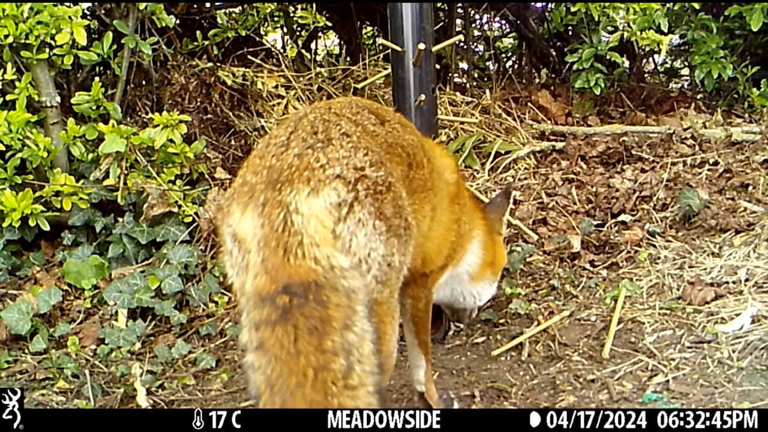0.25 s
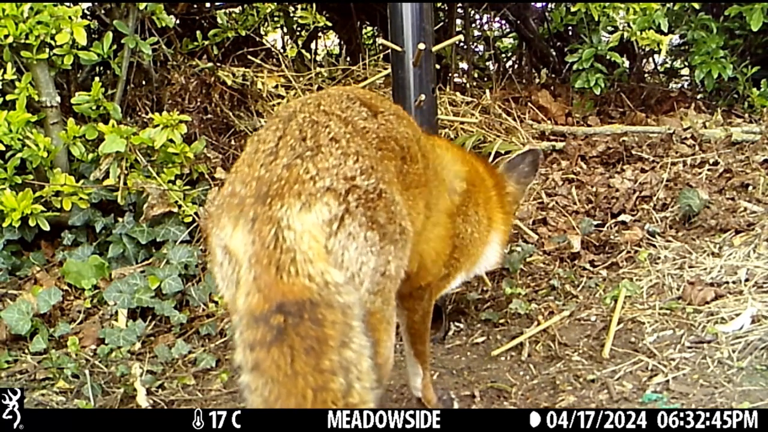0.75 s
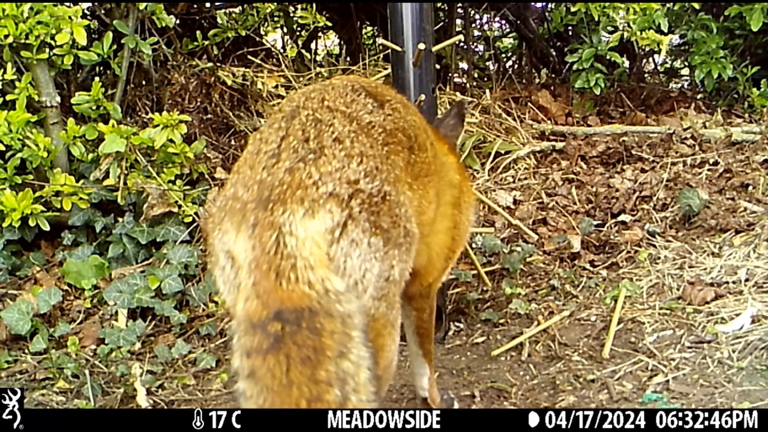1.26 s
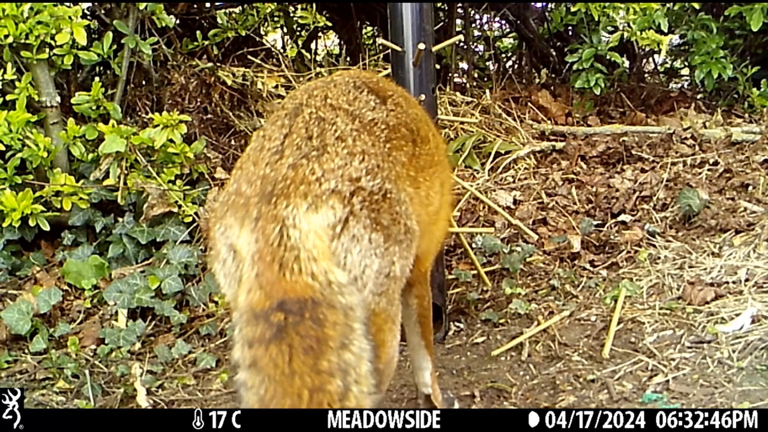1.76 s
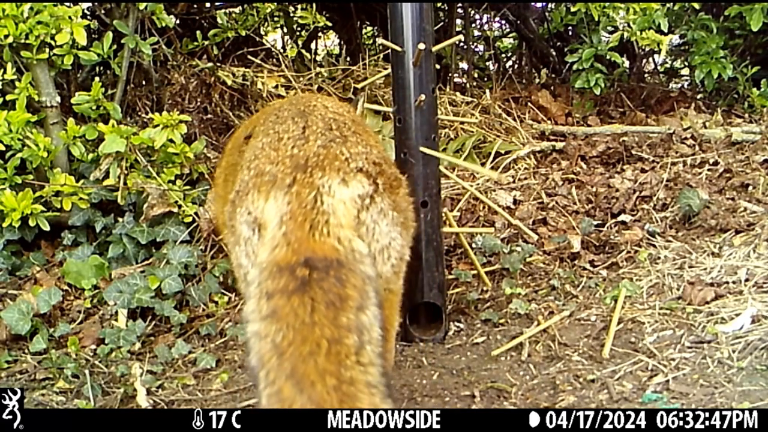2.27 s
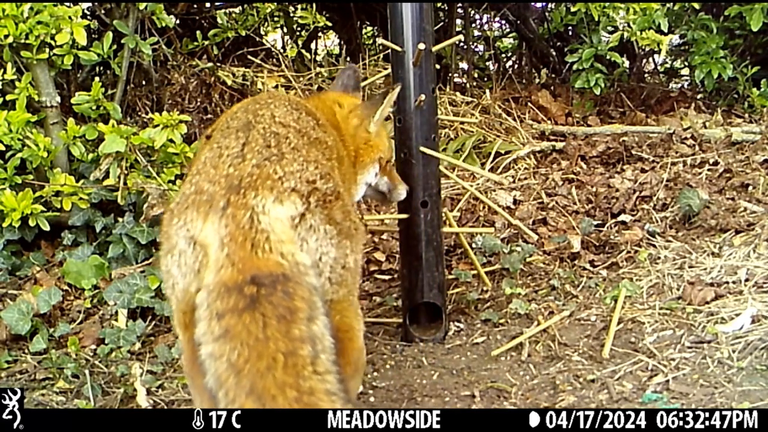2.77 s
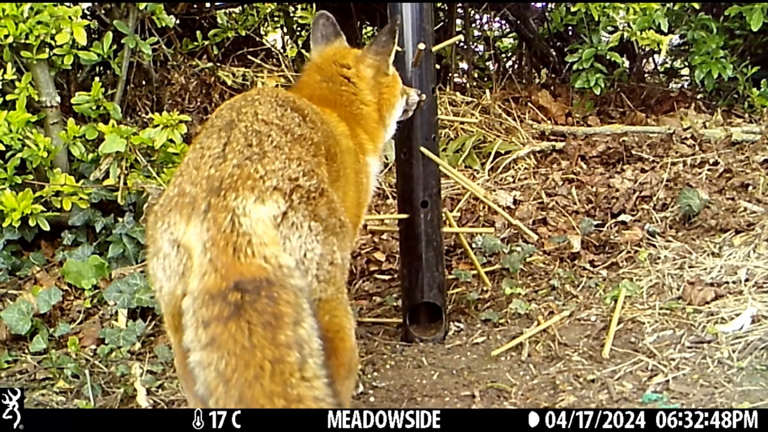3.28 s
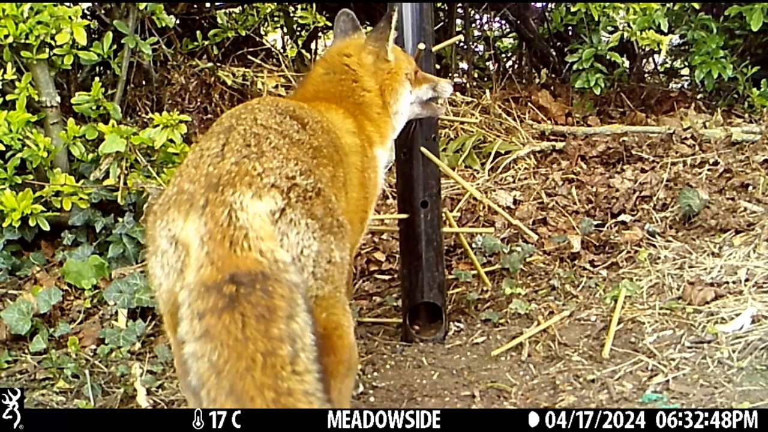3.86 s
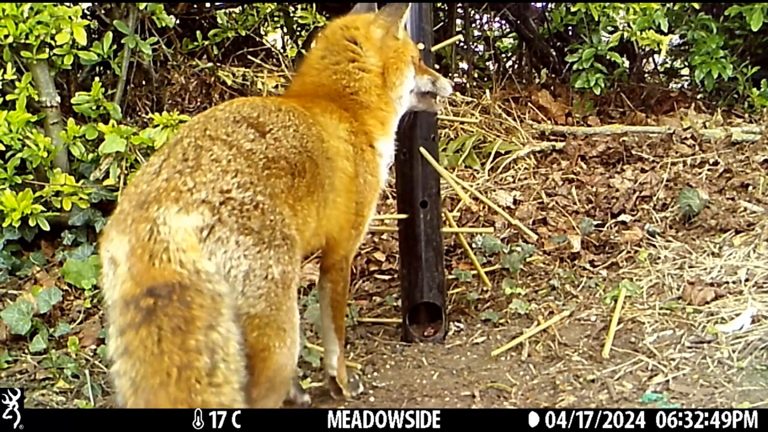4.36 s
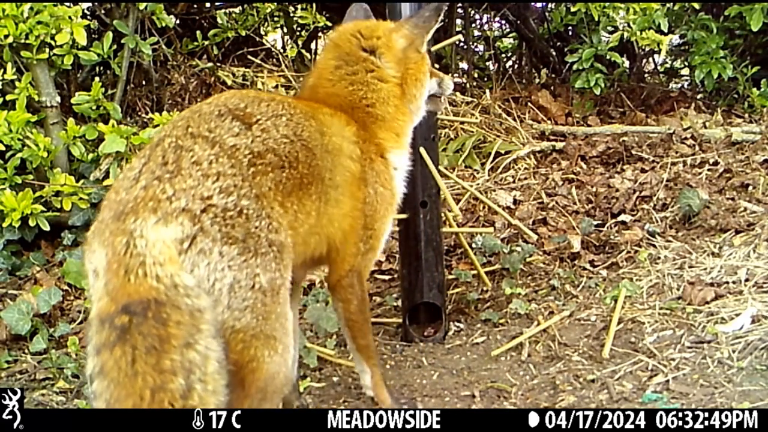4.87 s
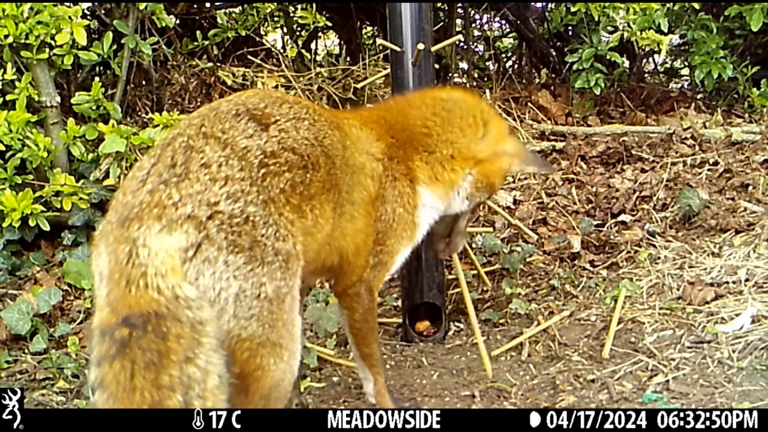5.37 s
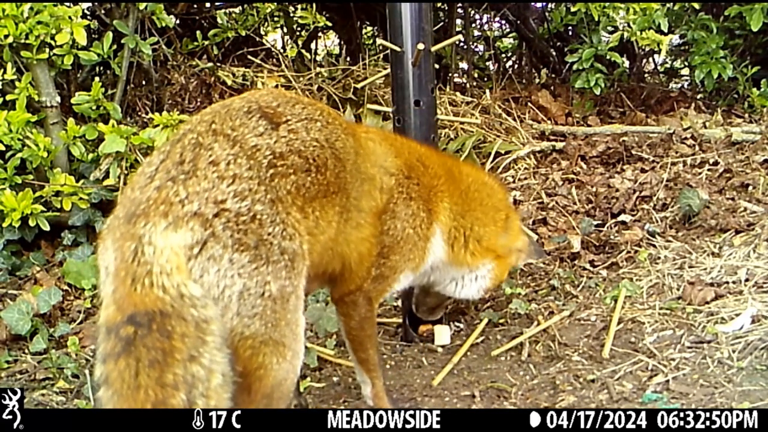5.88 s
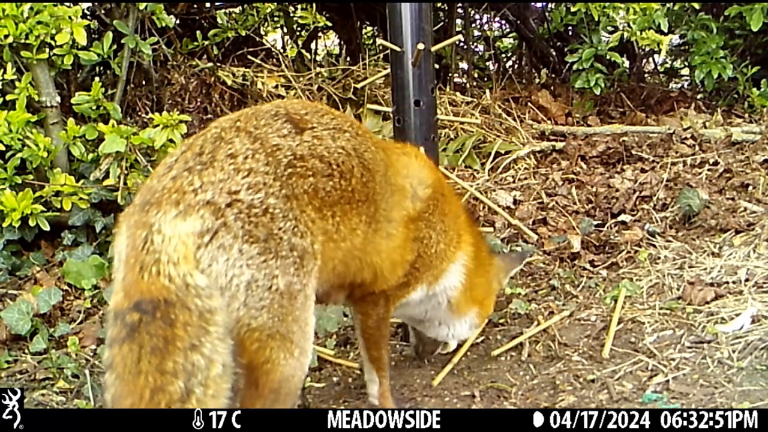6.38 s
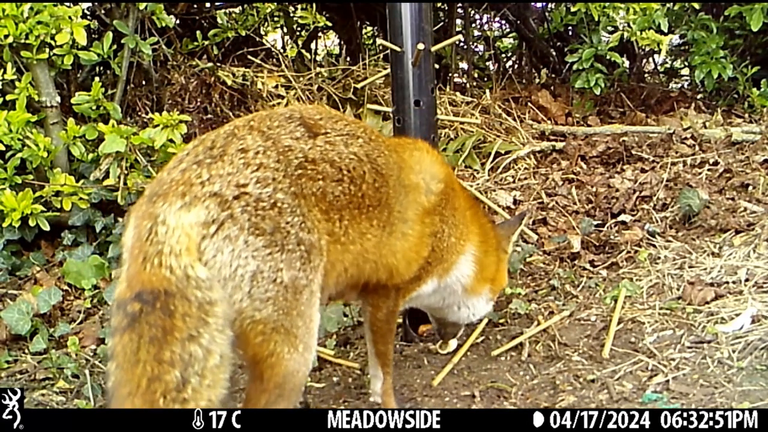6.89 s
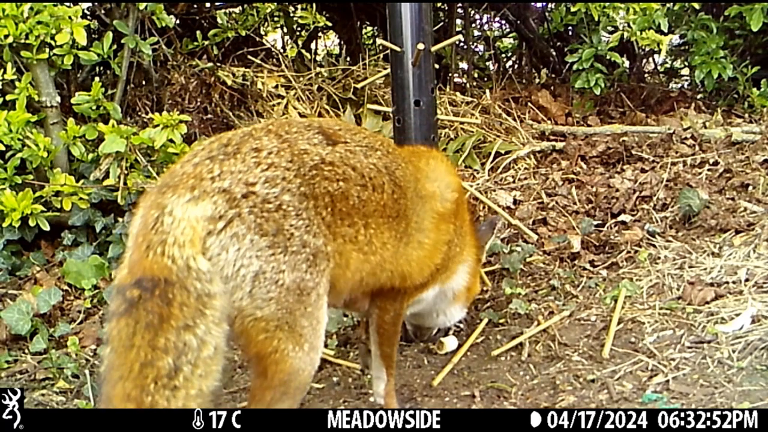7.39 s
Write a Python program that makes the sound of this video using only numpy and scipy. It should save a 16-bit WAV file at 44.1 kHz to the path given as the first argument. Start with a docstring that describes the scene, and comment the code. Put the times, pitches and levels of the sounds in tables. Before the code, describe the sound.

A fox works at a garden pipe feeder: sparse clicks, a bright clink, then a dense clattering burst, over faint bird chirps and soft air.

```python
"""Fox at the pipe feeder

A fox pulls a stick out of an upright plastic pipe feeder, close to a small outdoor camera's microphone.
Sticks and hard treats knock, clink, tick and rattle: noise cracks through resonances, plus decaying modes.
Sticks slide as random slips. Further back, sparrows chirp as gliding tones with noise-tail echoes from
the hedge, over filtered-noise air and the drone of one far engine.
"""
import sys
import numpy as np
from scipy import signal
from scipy.fft import rfft, irfft, next_fast_len
from scipy.io import wavfile
from scipy.ndimage import map_coordinates

SR = 44100
rng = np.random.default_rng(int(sys.argv[2]) if len(sys.argv) > 2 else 0)


def wav_record(signal):
    """Record a signal, one row per channel, as 16-bit PCM in the file named by sys.argv[1]."""
    frames = np.transpose(np.atleast_2d(signal))
    bounded = np.clip(frames, -1, 1)
    # unit amplitude maps onto the largest positive 16-bit level
    quanta = np.round(bounded * 32767).astype(np.int16)
    wavfile.write(sys.argv[1], SR, quanta)


N = 336654

# Spectrum of distant traffic and garden air: (frequency [Hz], relative level [dB])
AIR = [(15, -29.5), (25, -4.5), (49, -4.5), (96, -5.5), (142, -8), (259, -9), (420, -12), (497, -9.5),
       (633, -9), (1130, -3.5), (1270, -5.5), (2890, -10), (3860, -14), (7060, -20), (7960, -23),
       (10300, -59.5), (17500, -120)]
AIR_DB = -59.5  # average level of the air
# Colour the camera housing adds to the air: (centre [Hz], width [Hz], level [dB])
HOUSING = [(54, 18, -8), (880, 240, -9.5), (1070, 500, -19.5), (1830, 420, -14.5)]
# Far engine: nearest moment, time from there to fall 3 dB, level when nearest
ENGINE_AT_S, ENGINE_SWELL_S, ENGINE_DB = .75, 0.27, -72

# Sparrow syllables, each a few slurs:
# (time from syllable start [s], length [s], first pitch [Hz], last pitch [Hz], relative level [dB])
CHIRRUP = [(.004, 0.027, 4400, 3470, -6.5), (.025, 0.0442, 3600, 3150, -11.5),
           (0.061, 0.0204, 3350, 3980, 1.5), (.098, .048, 3850, 3060, -11)]
CHEEP = [(.01, .07, 3950, 4020, -6), (.068, 0.023, 4150, 4520, -4.5), (.094, .034, 4215, 2950, 3.5)]
CHIP = [(.002, .022, 3565, 3970, -1.5), (.048, .032, 3400, 3050, -6.5)]
TWEET = [(0, .035, 3900, 4360, -7.5), (.025, .05, 4200, 3450, -4)]
WHISTLE = [(0, .09, 3230, 2960, -1.5)]
# Sparrow calls in the hedge: (time [s], relative level [dB], syllable)
CHIRPS = [(.158, -47.5, CHIRRUP), (0.699, -50.5, CHEEP), (1.35, -47.5, CHIRRUP), (1.722, -52.5, CHIP),
          (1.915, -52.5, TWEET), (2.41, -49, CHIRRUP), (2.67, -50.5, CHIP), (2.9, -55.5, TWEET),
          (4.84, -54.5, WHISTLE), (6.489, -60, TWEET), (6.79, -52, CHIRRUP), (7.215, -53.5, CHIP),
          (7.471, -58, TWEET)]

# Resonances of a contact, low to high: (centre [Hz], width [Hz], relative level [dB])
KNOCK_BODY = [(445, 55, -9.5), (803, 140, -7.5), (1463, 210, -2.5), (1910, 150, -1), (2390, 390, -4.5)]
CLICK_BODY = [(2760, 280, -9), (3170, 180, -2.5), (3600, 240, 0.5), (4200, 430, -6.5)]
SNAP_BODY = [(5070, 440, 4.5), (5690, 400, 5.5), (6490, 460, 0.5), (7300, 400, -18.5)]
# Bending modes of a stick: (multiple of its pitch, relative level [dB], share of its t60)
STICK_MODES = [(.405, -28, .6), (.537, -20.5, 1.2), (.755, -15.5, 0.34), (.872, -4, 0.39),
               (.988, -6.5, 0.29), (1, 0.5, 1), (1.16, -24, 0.49), (1.58, -31.5, .5)]
STICK_RING_DB = -5.5  # the ring against the crack of the blow
# Modes of the pipe wall: (frequency [Hz], relative level [dB], t60 [s])
PIPE_MODES = [(448, -27, 0.11), (1436, -0.5, 0.1), (1469, -1, 0.15), (2220, -7.5, 0.043),
              (2830, -10, 0.054), (3205, -3, 0.089), (3760, -4, 0.18), (6400, -20, 0.088)]

# Loose pieces rattling on after a disturbance: (start [s], length [s], relative level [dB])
RATTLES = [(3.589, .08, -44), (3.86, .05, -45), (5.0, .25, -41), (5.405, 0.12, -34.5)]
RATTLE_PER_S, RATTLE_SCATTER_DB = 38, 2  # contacts a second, spread of their strength
RATTLE_HZ, RATTLE_SPREAD = 3550, .08  # pitch of the pieces, its relative spread
# Strokes of sticks and treats sliding on the pipe: (start [s], length [s], relative level [dB])
SLIDES = [(4.18, .25, -62), (4.469, 0.039, -55), (4.83, .17, -61), (5.032, 0.19, -56.5),
          (5.416, 0.1, -51.5)]
SLIDE_ATTACK_S, SLIDE_RELEASE_S = 0.035, 0.066  # time constants before and after a stroke

# Hard blows that leave a stick ringing; levels are relative:
# (time [s], level [dB], knock [dB], snap [dB], stick pitch [Hz], ring t60 [s])
CLINKS = [(2.655, -30, -23, -23, 3660, 0.071), (2.816, -35, -27, -25, 3610, .11),
          (3.542, -24, -7.5, -7.5, 3595, .16), (3.651, -31, -17, -9, 3620, 0.056),
          (3.668, -33.5, -26, -13, 3660, 0.049), (3.69, -43, -13, -31, 3590, .17),
          (5.349, -25, -16, -20, 3610, 0.063), (5.38, -17, -12.5, -9, 3573, 0.074),
          (5.385, -20, -10, -12, 3830, .08), (5.559, -36, -17, -25, 3680, 0.15)]
# Blows that set the pipe wall ringing; levels are relative:
# (time [s], level [dB], knock [dB], snap [dB], pitch [Hz], ring [dB])
KNOCKS = [(4.4885, -42, -16, -20, 3500, -15), (4.9751, -21.5, -13, -13.5, 3720, -15.5),
          (5.0578, -27.5, -22, -29, 3040, -12), (5.0925, -26.5, -18, -19.5, 3500, -11.5),
          (5.1776, -20.5, -20.5, -21, 3250, -9), (5.2076, -26, -25, -26, 3160, -6),
          (5.5205, -21.5, -13.5, -21, 3600, -22)]
# Dry hits of held sticks and tumbling treats; levels are relative:
# (time [s], level [dB], knock [dB], snap [dB], pitch [Hz])
TICKS = [(.5272, -28, -27, -11, 4230), (1.29, -41.5, -13, -23, 3230), (2.7157, -38, -28, -20, 3760),
         (3.6242, -33.5, -16, -17, 3570), (3.9345, -40.5, -19, -11, 3950), (4.7062, -43, -17, -19, 3540),
         (4.8399, -41.5, -8.5, -32, 3080), (5.0828, -31, -14.5, -23.5, 3500), (5.1095, -20, -30, -13, 3590),
         (5.1427, -30, -20, -23, 3660), (5.2604, -35, -8, -25, 1520), (5.2909, -34, -9, -20, 3100),
         (5.3094, -36.5, -17, -30, 3600), (5.3283, -26, -16, -24, 3440), (5.392, -15.5, -13.5, -15.5, 3490),
         (5.396, -14.5, -14, -14.5, 3070), (5.4735, -27.5, -11, -8, 4050), (5.5039, -29.5, -31, -24, 3520),
         (5.5787, -24, -12, -20, 3450), (5.6111, -35.5, -25, -8, 3320), (6.1968, -40, -26, -25, 3960)]
# Dull bumps of treats in the pipe and on the soil: (time [s], level [dB], pitch [Hz], t60 [s])
THUDS = [(3.543, -38, 1420, .04), (4.977, -50, 445, 0.076), (5.394, -39.5, 755, 0.085),
         (5.463, -37, 1750, 0.013), (5.590, -36, 553, 0.024), (5.596, -45.5, 425, 0.051)]

TOP_HZ, ROLL_OFF_HZ = 8160, 7680  # nothing passes above the first; 3 dB down at the second


def amp(db):
    """Amplitude factor of a level in dB."""
    return 10 ** (np.asarray(db) / 20)


def unit(x):
    """x scaled to an RMS of one."""
    return x / np.sqrt(np.mean(x ** 2) + 1e-20)


def add(track, s, sound):
    """Mix a sound in at time s."""
    part = track[max(round(s * SR), 0):][:len(sound)]
    part += sound[:len(part)]


def filtered(x, response):
    """x times a response of frequency, padded so that its tail does not wrap round."""
    m = next_fast_len(len(x) + 8192)
    spectrum = rfft(x, m) * response(np.fft.rfftfreq(m, 1 / SR))
    return irfft(spectrum, m)[:len(x)]


def resonate(x, body):
    """x through parallel damped resonances."""
    def response(f):
        total = 0
        for k, (centre, width, db) in enumerate(body):
            damping = 1j * f * width
            # neighbours alternate in sign
            total = total + (-1) ** k * amp(db) * damping / (centre * centre - f * f + damping)
        return total
    return filtered(x, response)


def wobble(rate, size):
    """A smooth random curve, rate knots a second."""
    knots = rng.standard_normal(int(size * rate / SR) + 4)
    return map_coordinates(knots, [np.arange(size) * rate / SR])


def echo(x, t60, build_up):
    """Scattered returns from leaves and fences: a noise tail that builds up, then decays (times in s)."""
    t = np.arange(SR * 3 // 4) / SR
    tail = rng.standard_normal(len(t)) * amp(-60 * t / t60) * (1 - np.exp(-t / build_up))
    return signal.fftconvolve(x, tail / np.linalg.norm(tail))[:len(x)]


def air():
    """A steady distant hush: noise shaped by the air and housing, its level drifting a little."""
    hz, db = np.transpose(AIR)
    hush = filtered(rng.standard_normal(N), lambda f: amp(np.interp(np.log(f + 1), np.log(hz), db)))
    hush = hush + sum(resonate(hush, [mode]) for mode in HOUSING)
    drift_db = 0.46 * wobble(2.38, size=N) + 0.34 * wobble(12, size=N)
    return unit(hush) * amp(AIR_DB + drift_db)


def traffic():
    """The low drone of an engine passing far away: narrow noise, falling with its distance."""
    drone = resonate(rng.standard_normal(N), [(117, 92, 0)])
    drone = unit(resonate(drone, [(124, 110, 0)]))
    distance = np.hypot(1, (np.arange(N) / SR - ENGINE_AT_S) / ENGINE_SWELL_S)
    return drone * amp(ENGINE_DB) / distance


def slur(length, first_hz, last_hz):
    """One buzzy tone, its pitch shaking quickly, that swells and fades as it glides."""
    u = np.linspace(0, 1, round(length * SR))
    pitch = first_hz + (last_hz - first_hz) * u
    pitch = pitch * (1 + .045 * wobble(700, size=len(u)))
    return np.sin(np.pi * u) * np.sin(2 * np.pi * np.cumsum(pitch) / SR)


def sparrows():
    """Each chirp is a run of slurs, heard mostly as echoes from the hedge."""
    out = np.zeros(N)
    for s, db, syllable in CHIRPS:
        call = np.zeros(SR)
        for delay, length, first_hz, last_hz, level in syllable:
            add(call, delay, amp(level) * slur(length, first_hz, last_hz))
        short_echo = amp(3.0) * echo(call, t60=0.3, build_up=0.0075)
        long_echo = amp(-2) * echo(call, t60=1, build_up=0.041)
        add(out, s, amp(db) * (amp(1.5) * call + short_echo + long_echo))
    return out


def contact(knock_db, snap_db, hz, own_db, t60, chatter_db, chatter_t60):
    """A sharp crack, then brief chatter, through shared resonances and the struck piece's own pitch."""
    t = np.arange(SR // 4) / SR
    force = amp(-60 * t / t60) + amp(chatter_db - 60 * t / chatter_t60)
    sound = 0
    for body, db in (KNOCK_BODY, knock_db + 5.0), (CLICK_BODY, -3), (SNAP_BODY, snap_db + 2.0):
        # every point of contact excites the resonances a little differently
        varied = [(centre * (1 + .035 * rng.normal()), width, level + 2 * rng.normal())
                  for centre, width, level in body]
        sound = sound + amp(db - 28.5) * unit(resonate(force * rng.standard_normal(len(t)), varied))
    own = resonate(force ** 2 * rng.standard_normal(len(t)), [(hz, 160, 0)])
    return sound + amp(own_db - 29.5) * unit(own)


def rattling():
    """Loose pieces touch lightly at uneven intervals, each with its own strength and pitch."""
    out = np.zeros(N)
    for start, length, db in RATTLES:
        count = max(1, round(length * RATTLE_PER_S))
        for k, (late, strength, size) in enumerate(rng.standard_normal((count, 3))):
            hz = RATTLE_HZ * np.exp(RATTLE_SPREAD * size)
            touch = contact(knock_db=-10.5, snap_db=-20.5, hz=hz, own_db=-1.5, t60=0.013,
                            chatter_db=-9.5, chatter_t60=0.055)
            s = start + (k + .3 * late) / RATTLE_PER_S
            add(out, s, amp(db + RATTLE_SCATTER_DB * strength) * touch)
    return out


def stroke(start, length):
    """Attack, hold and release of one slide."""
    t = np.arange(N) / SR - start
    attack = np.minimum(t, 0) / SLIDE_ATTACK_S
    release = np.maximum(t - length, 0) / SLIDE_RELEASE_S
    return np.exp(attack - release)


def sliding():
    """Rough bark catches on the rim of a hole in many tiny slips, and the pipe wall sings faintly."""
    slips = (rng.random(N) < 1400 / SR) * rng.standard_normal(N)  # about 1400 a second
    pipe_wall = [(1460, 53, 0)]
    paths = (KNOCK_BODY, -7), (CLICK_BODY, -3), (SNAP_BODY, -9), (pipe_wall, -10)
    rub = sum(amp(db) * unit(resonate(slips, body)) for body, db in paths)
    strokes = [amp(db) * stroke(start, length) for start, length, db in SLIDES]
    return rub * np.max(strokes, axis=0)


def ring(modes, scatter_db):
    """Free modes, decaying sines struck at new strengths each time."""
    t = np.arange(SR // 4) / SR
    tone = 0
    for hz, db, t60 in modes:
        level_db = db + scatter_db * rng.normal() - 60 * t / t60
        tone = tone + amp(level_db) * np.sin(2 * np.pi * hz * t)
    return tone * (1 - np.exp(-t / .0008))  # soft onset


def clinks():
    """A hard blow cracks and leaves the stick's bending modes ringing."""
    out = np.zeros(N)
    for s, db, knock_db, snap_db, hz, t60 in CLINKS:
        crack = contact(knock_db, snap_db, hz, own_db=-7.5, t60=0.016, chatter_db=-10.0, chatter_t60=0.079)
        stick = ring(np.multiply(STICK_MODES, [hz, 1, t60]), scatter_db=1.5)
        add(out, s, amp(db) * (crack + amp(STICK_RING_DB) * stick))
    return out


def knocks():
    """A blow cracks and sets the modes of the pipe wall ringing."""
    out = np.zeros(N)
    for s, db, knock_db, snap_db, hz, ring_db in KNOCKS:
        crack = contact(knock_db, snap_db, hz, own_db=-5.5, t60=.01, chatter_db=-7, chatter_t60=0.068)
        add(out, s, amp(db) * (crack + amp(ring_db - 9) * ring(PIPE_MODES, scatter_db=2.5)))
    return out


def ticks():
    """Held sticks and tumbling treats hit dry, a contact with no free ring."""
    out = np.zeros(N)
    for s, db, knock_db, snap_db, hz in TICKS:
        hit = contact(knock_db, snap_db, hz, own_db=-0.5, t60=.014, chatter_db=-7.0, chatter_t60=0.07)
        add(out, s, amp(db) * hit)
    return out


def thuds():
    """Treats bump dully, each a decaying sine with a soft onset."""
    out, t = np.zeros(N), np.arange(SR // 4) / SR
    for s, db, hz, t60 in THUDS:
        add(out, s, amp(db - 60 * t / t60) * np.sin(2 * np.pi * hz * t) * (1 - np.exp(-t / 0.0018)))
    return out


def feeder():
    """Sticks and treats strike each other, the pipe wall and the soil."""
    return clinks() + knocks() + ticks() + thuds()


def scene():
    """The feeder close by with a faint garden echo, birds and traffic behind it."""
    garden = air() + traffic() + sparrows()
    wood = rattling() + sliding() + feeder()
    return (wood + amp(-16.5) * echo(wood, t60=.35, build_up=0.0067) + garden)[None]


def record(dry):
    """The camera's microphone channel rolls off steeply at its band limit."""
    def roll_off(f):
        return (f < TOP_HZ) / np.sqrt(1 + (f / ROLL_OFF_HZ) ** 80)
    return filtered(dry[0], roll_off)[None]


dry = scene()
out = record(dry)
wav_record(out)
```